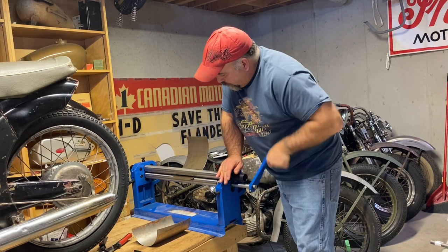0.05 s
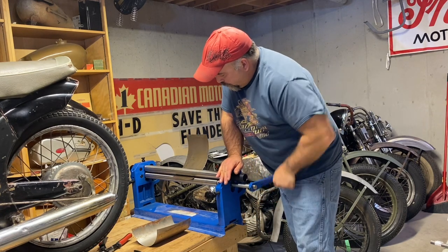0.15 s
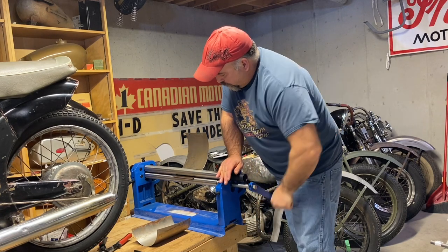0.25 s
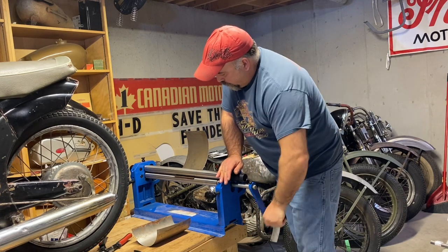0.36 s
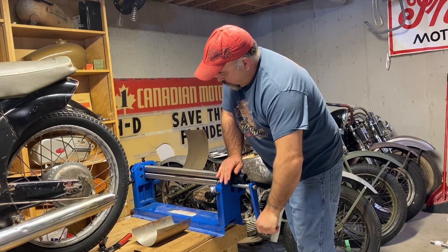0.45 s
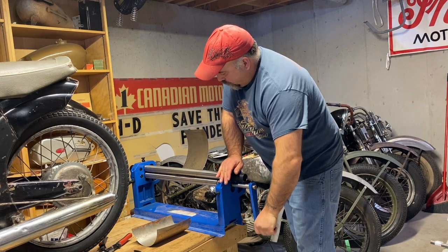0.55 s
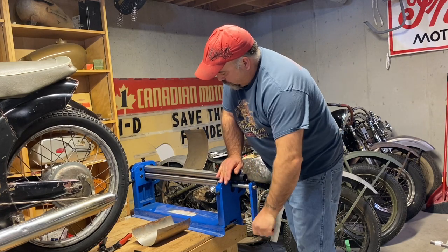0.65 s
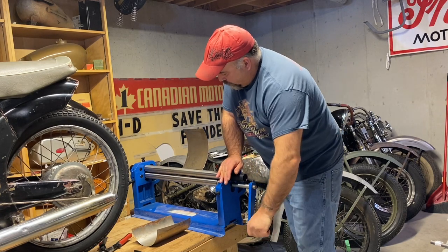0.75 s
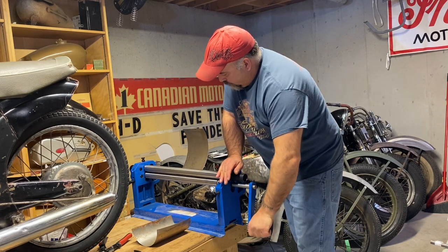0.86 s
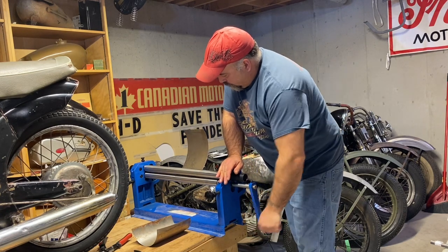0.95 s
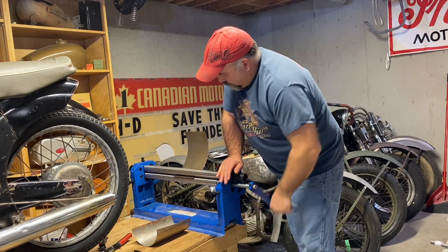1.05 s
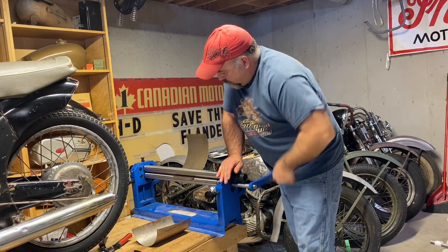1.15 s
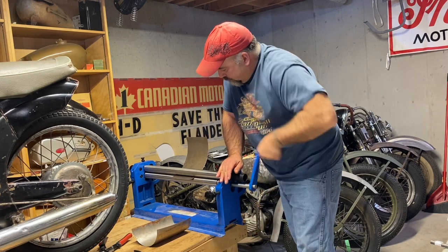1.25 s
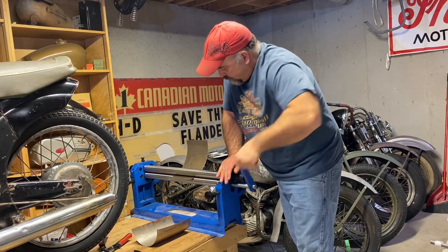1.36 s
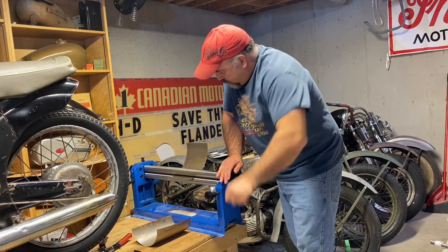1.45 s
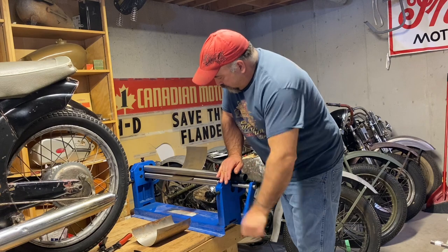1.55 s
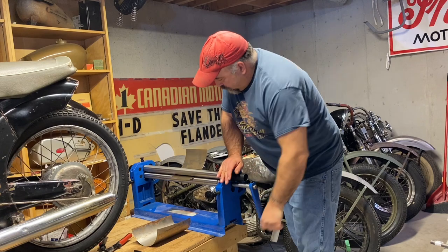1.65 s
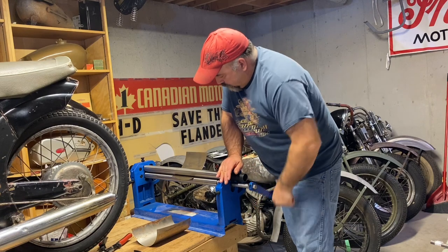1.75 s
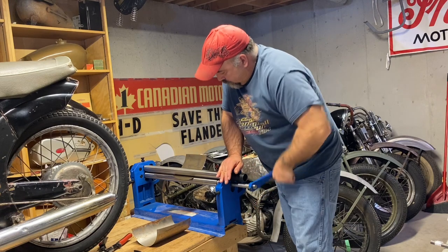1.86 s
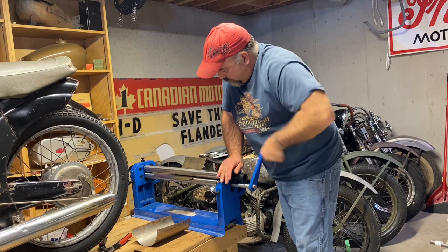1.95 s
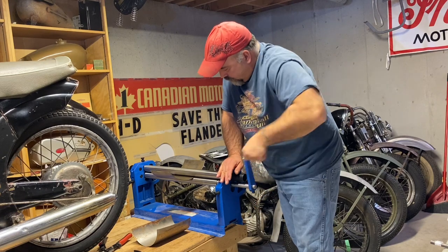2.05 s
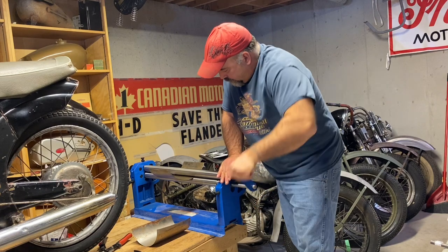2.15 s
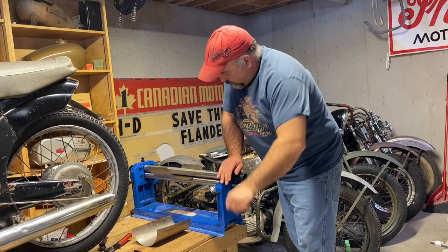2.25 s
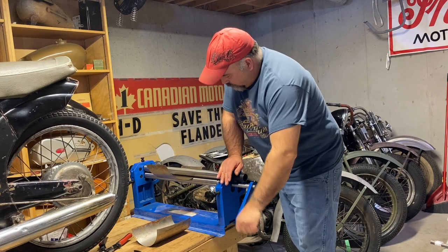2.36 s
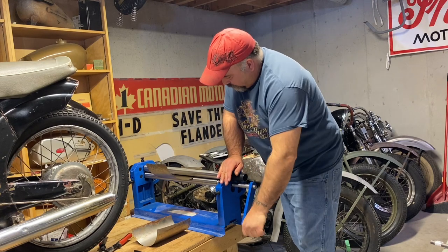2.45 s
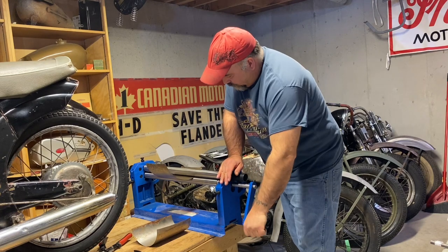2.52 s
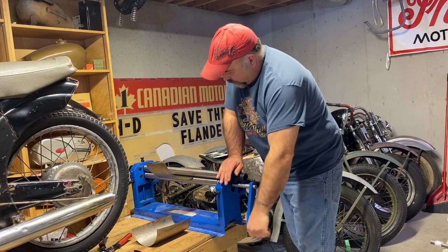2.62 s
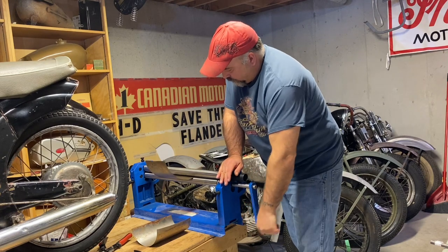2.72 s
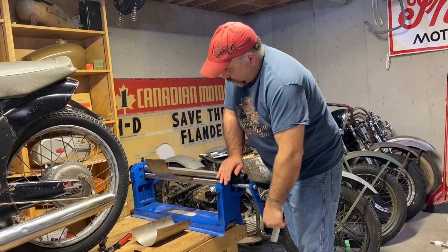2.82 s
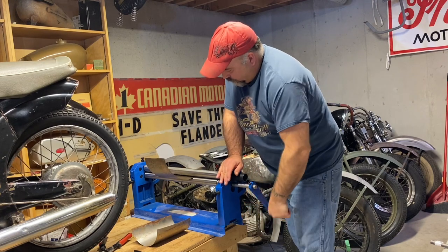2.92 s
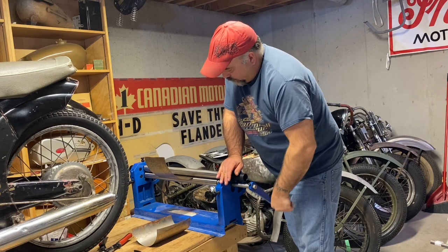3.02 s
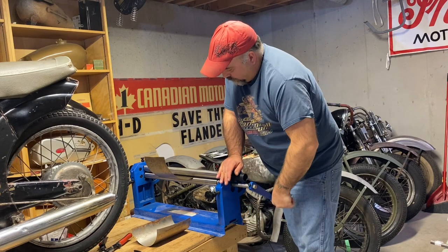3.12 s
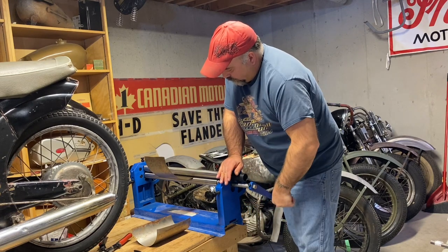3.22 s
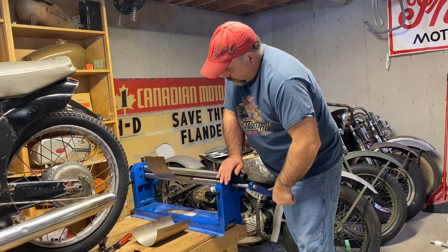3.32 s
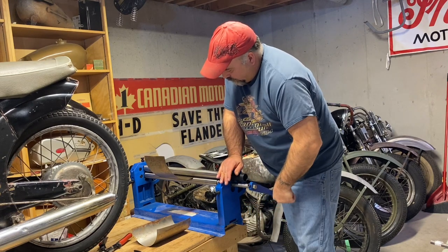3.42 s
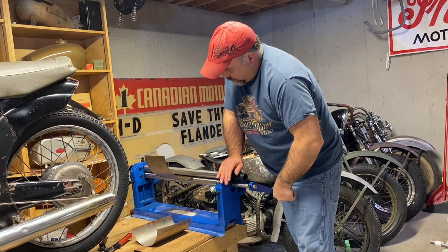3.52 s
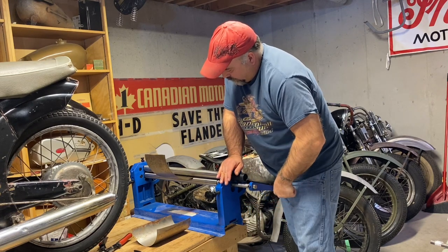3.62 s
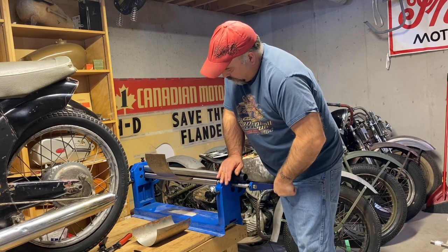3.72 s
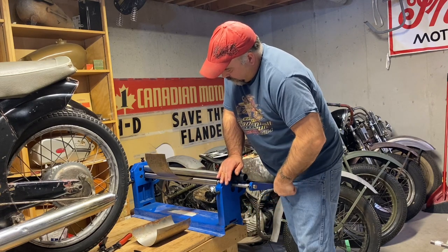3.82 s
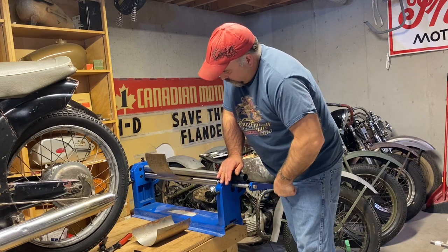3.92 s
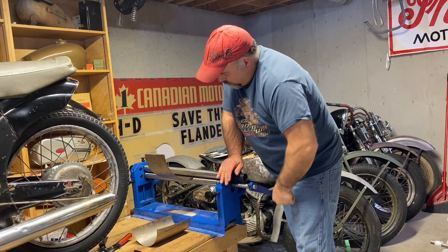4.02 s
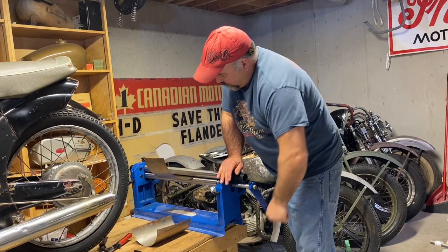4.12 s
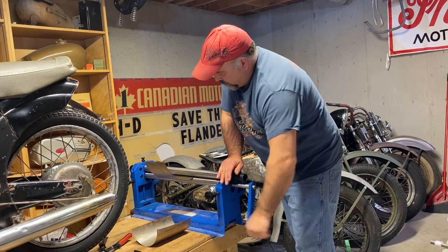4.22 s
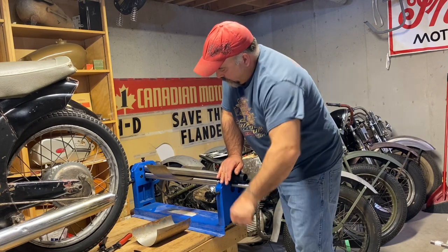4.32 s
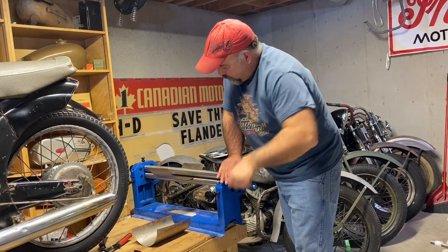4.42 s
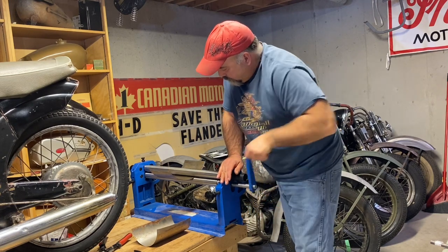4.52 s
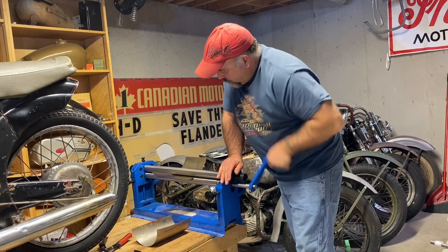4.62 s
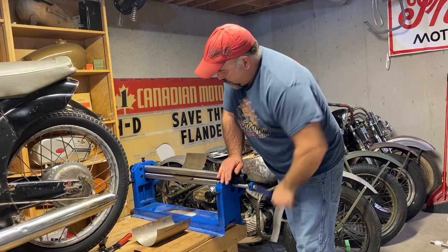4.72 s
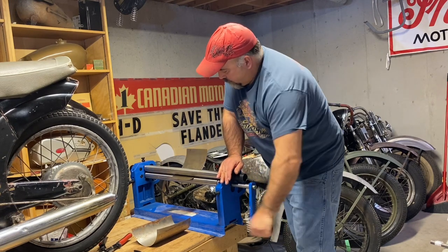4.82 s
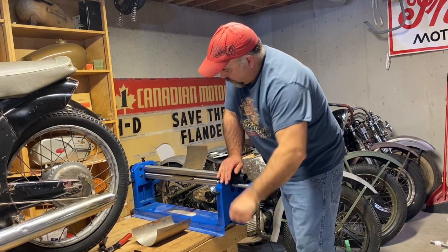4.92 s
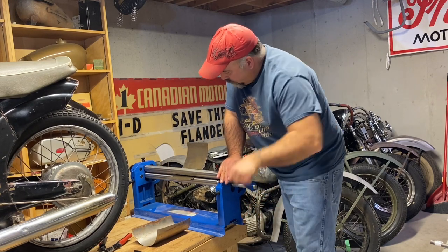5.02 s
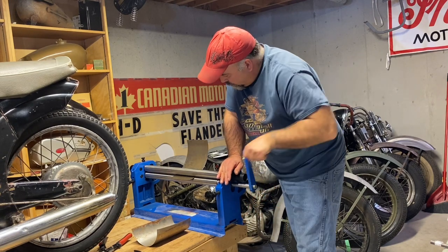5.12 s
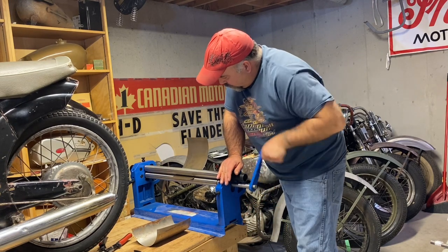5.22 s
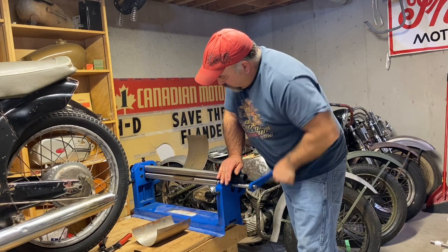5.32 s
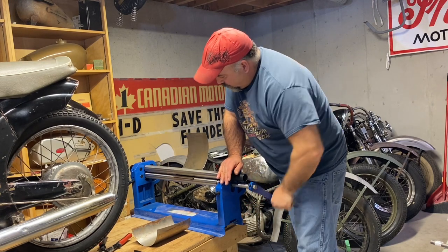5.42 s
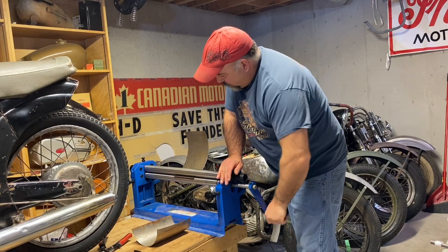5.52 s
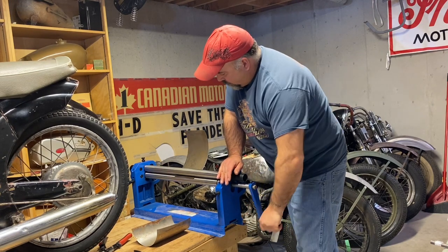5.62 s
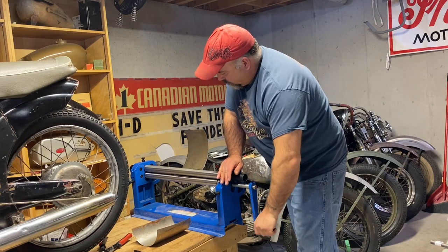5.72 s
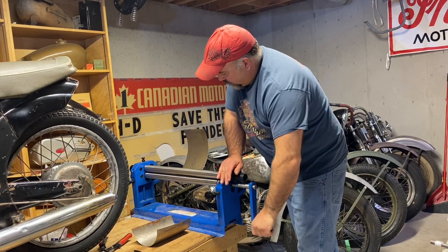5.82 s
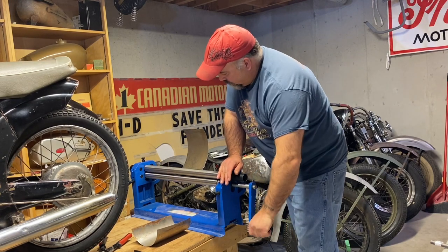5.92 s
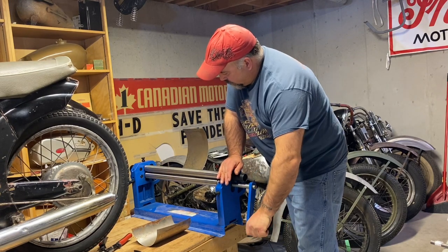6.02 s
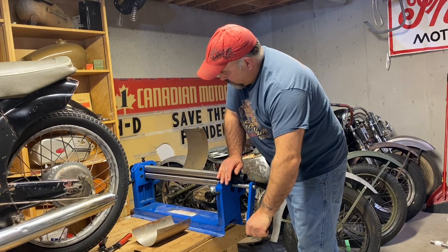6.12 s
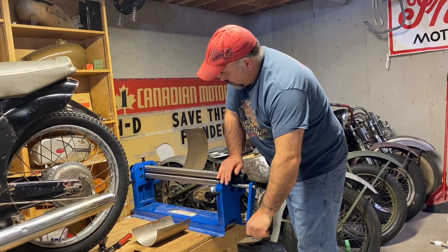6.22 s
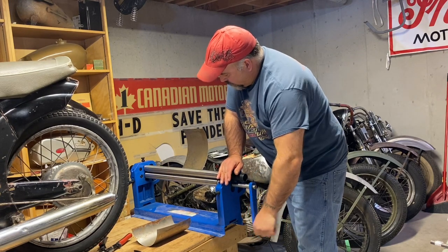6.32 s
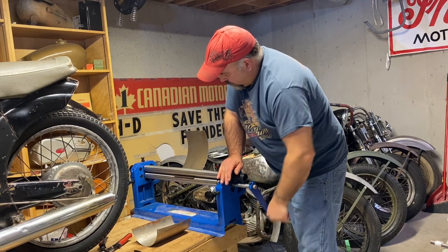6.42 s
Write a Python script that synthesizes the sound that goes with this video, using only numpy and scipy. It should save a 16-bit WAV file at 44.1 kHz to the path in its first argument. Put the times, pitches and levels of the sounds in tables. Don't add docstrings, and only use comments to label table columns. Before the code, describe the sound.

A hand-cranked steel roller works a metal sheet on a wooden bench, heard close in stereo in a concrete workshop with short reverberation. A steady low electrical hum and soft air lie underneath. At 0 s a dull woody rumble is already under way, fading by 0.5. Around 0.9 a bright rattle and clack start a busy spell: rolling rumble, gritty scraping, gear ticks and booming planks, with dense hard clacks at 1.35-1.6 and 1.7-2.5, some ringing briefly. A resonant knock at 2.8 ends it; only rubs and separate clacks near 3.2 and 3.5 break the lull. At about 4 s the cranking returns, uneven and scraping, with clacks at 4.1, 4.5 and 5.1 and hollow wooden thumps, thinning after 5.5. Near quiet follows until a sharp clack at 6.3 and another short push with a metallic knock around 6.4.

```python
import sys
import numpy as np
from scipy import signal
from scipy.fft import rfft, irfft, next_fast_len
from scipy.io import wavfile

SR = 44100
rng = np.random.default_rng(int(sys.argv[2]) if len(sys.argv) > 2 else 0)


def how_loud(loudness_db):
    steps = np.asarray(loudness_db, float) / 20
    return 10 ** steps


def waveform_to_disk(signal):
    frames = np.transpose(np.atleast_2d(signal))
    scaled = np.clip(frames, -1, 1) * 32767
    samples = np.round(scaled).astype(np.int16)
    wavfile.write(sys.argv[1], SR, samples)


N = 285327
SIZE = next_fast_len(N + SR)
HZ = np.maximum(np.arange(SIZE // 2 + 1) * SR / SIZE, 1)
TIME = np.arange(N) / SR


def rms_one(x):
    return x / np.sqrt(np.mean(x ** 2) + 1e-30)


def at_hz(points, hz):
    table_hz, value = np.array(points).T
    return np.interp(np.log(hz), np.log(table_hz), value)


def through(x, response):
    return irfft(rfft(x, SIZE) * response, SIZE)[..., :N]


def band(x, low_hz, high_hz):
    edges = [low_hz, min(high_hz, 0.45 * SR)]
    return signal.sosfilt(signal.butter(2, edges, "band", fs=SR, output="sos"), x)


def drift(rate_hz):
    r = np.exp(-2 * np.pi * rate_hz / SR)
    slow = signal.lfilter([1], [1, -2 * r, r * r], rng.standard_normal(N + SR))
    return rms_one(slow[SR:])


def resonate(x, hz, width_hz):
    r = np.exp(-np.pi * width_hz / SR)
    gain = np.array([1, 0, -1]) * (1 - r * r) / 2
    return signal.lfilter(gain, [1, -2 * r * np.cos(2 * np.pi * hz / SR), r * r], x + 1e-18)


def grit(per_s, spread_db):
    sizes = how_loud(spread_db * np.minimum(rng.exponential(1, N), 5)) * rng.standard_normal(N)
    return rms_one(sizes * (rng.random(N) < per_s / SR))


# (frequency [Hz], likeness [0 to 1])
LEFT_RIGHT_LIKENESS = [(90, 0.94), (250, 0.85), (600, 0.38), (1400, 0.0177), (3000, 0.45), (5600, 0.0846),
                       (7000, 0.85), (15000, 1)]


def spread(common, apart):
    alike = np.clip(at_hz(LEFT_RIGHT_LIKENESS, HZ), 0, 1)
    return np.sqrt(1 + alike) * common + np.sqrt(1 - alike) * apart * [[1], [-1]]


# (frequency [Hz], level [dB per Hz])
ROOM_AIR = [(25, -112), (60, -82), (160, -97.5), (500, -110), (1100, -117), (2000, -123), (8000, -130),
            (16000, -138)]


def background():
    turn = 2 * np.pi * np.cumsum(120.8 + 0.25 * drift(8.4)) / SR
    hum = np.sqrt(2) * how_loud(-49.5 + 1.1 * drift(25)) * np.sin(turn)
    air_level = how_loud(-2 + at_hz(ROOM_AIR, HZ)) * np.sqrt(SR / 2)
    common, apart = rfft(rng.standard_normal((2, N)), SIZE) * air_level
    return hum + irfft(spread(common, apart), SIZE)[:, :N]


# (frequency [Hz], width [Hz], level [dB])
BENCH_MODES = [(152, 3.1, -6.5), (213, 6.7, 9), (266.6, 49.8, 1), (310, 16.5, -31), (348, 5, -4.5),
               (441, 36, -1.5), (426.4, 6.8, 0.5), (530, 13.7, 1.5), (594, 7.9, -6), (748, 39, -10),
               (884, 600, -32.5), (1040, 13, -15.5)]


def bench(force, widen, patchy_db):
    answer = 0
    for k, (hz, width, db) in enumerate(BENCH_MODES):
        side = (-1) ** k
        answer = answer + side * how_loud(db + patchy_db * drift(8.0)) * resonate(force, hz, widen * width)
    return answer


def effort(s, length, levels_db):
    let_go = 1.375
    t = np.arange(0, N + 64, 64) / SR
    since = t - s[:, None]
    late = since / (length[:, None] * np.where(since > 0, let_go, 1))
    power = np.sum(how_loud(2 * levels_db[:, None]) * np.exp(-2 * late ** 2), axis=0)
    return np.interp(TIME, t, 10 * np.log10(power + 1e-14))


# (time [s], half length [s], weight on the rolls [dB], slip of the sheet [dB])
CRANK_PUSHES = [(0.0, 0.072, -43, -60.5), (0.177, 0.14, -49.5, -72), (0.347, 0.077, -55.5, -81),
                (0.983, 0.05, -50, -50.5), (1.13, 0.074, -47.5, -57.5), (1.245, 0.051, -38.5, -55.5),
                (1.393, 0.14, -51, -59), (1.55, 0.13, -41.5, -52.5), (1.672, 0.019, -36.5, -65),
                (1.887, 0.086, -52, -53.5), (2.056, 0.041, -41.5, -76), (2.23, 0.081, -44, -61.5),
                (2.311, 0.058, -40, -51), (2.475, 0.056, -60, -51.5), (2.632, 0.1, -60, -68.5),
                (2.8, 0.087, -55.5, -72), (2.94, 0.061, -55, -65), (3.995, 0.027, -44.5, -48.5),
                (4.124, 0.039, -53.5, -53), (4.264, 0.065, -43.5, -56), (4.442, 0.08, -44.5, -58),
                (4.646, 0.097, -45, -56), (4.825, 0.07, -58, -55), (4.985, 0.093, -44, -63),
                (5.09, 0.089, -44.5, -55.5), (5.313, 0.086, -44.5, -59), (5.415, 0.053, -46, -84),
                (5.642, 0.078, -60, -83), (6.348, 0.026, -58, -62), (6.42, 0.14, -51.5, -57.5)]
# (time [s], half length [s], level [dB])
BENCH_LURCHES = [(0.953, 0.031, -48.5), (1.21, .05, -61), (1.753, 0.055, -41.5), (1.997, 0.054, -42.5),
                 (2.316, 0.05, -58), (6.44, 0.04, -59), (1.537, 0.033, -45.5), (2.93, 0.039, -61),
                 (5.456, .03, -58), (.7, 0.073, -62.5), (3.64, .05, -65), (6.06, 0.088, -68)]
# (frequency [Hz], level [dB per Hz])
ROLL_RUMBLE = [(90, -43.5), (150, -2), (350, 6), (700, -12.5), (1200, -39), (2500, -50.5)]
# (frequency [Hz], level [dB per Hz])
SHEET_SCRAPE = [(600, 24.5), (1000, 22), (2000, 15.5), (4000, 11.5), (6000, 2), (8000, 1), (10000, -48.5)]
# (frequency [Hz], level [dB per Hz])
BENCH_SWAY = [(20, -55), (35, -8.5), (52, 11), (68, 17.5), (85, 0.5), (105, 12), (150, 18.5), (220, -48.5)]


def rolls():
    s, length, weight_db, slip_db = np.transpose(CRANK_PUSHES)
    hiss_db = -82 + 0.62 * (slip_db + 67.0)
    sway_db = -52 + 0.63 * (weight_db + 45)
    sway_pushes = np.hstack([[s, 1.74 * length, sway_db], np.transpose(BENCH_LURCHES)])

    force = grit(900, spread_db=3.5) * how_loud(1.2 * drift(26.4))
    rumble = rms_one(bench(force, widen=1.66, patchy_db=1.0))
    rumble = rumble + 0.84 * rms_one(through(force, how_loud(at_hz(ROLL_RUMBLE, HZ))))

    slip = grit(2500, spread_db=1.5) * how_loud(3 * drift(25))
    rough = through(slip, how_loud(at_hz(SHEET_SCRAPE, HZ)))
    regions_hz = np.geomspace(700, 7900, num=8)
    scrape = rms_one(sum(how_loud(1.6 * drift(9)) * band(rough, hz / 1.17, hz * 1.19) for hz in regions_hz))
    hiss = rms_one(band(band(slip, 4600, 17000), 7600, 15000))

    sway = rms_one(through(rng.standard_normal(N), how_loud(at_hz(BENCH_SWAY, HZ)))) * how_loud(0.86 * drift(4.9))
    wood = how_loud(effort(s, length, weight_db) - 1.5) * rumble + how_loud(effort(*sway_pushes) + 3.5) * sway
    steel = how_loud(effort(s, length, slip_db) + 2.0) * scrape + how_loud(effort(s, length, hiss_db) + 2) * hiss
    return wood, steel


def swelling_tone(hz, s, length, db):
    return how_loud(effort(s, length, db)) * np.sin(2 * np.pi * hz * TIME)


# (time [s], level [dB])
MID_PLANK_BOOMS = [(.07, -53), (.15, -42.5), (1.09, -48), (1.19, -47), (1.4, -42.5), (1.5, -50),
                   (1.61, -39.5), (4.33, -49), (4.41, -44), (4.58, -43), (4.97, -42), (5.02, -43),
                   (5.22, -46), (5.62, -52.5)]
# (time [s], level [dB])
LOW_PLANK_BOOMS = [(.12, -47), (.22, -51), (.3, -47), (.96, -47), (1.24, -44), (1.33, -38.5), (1.47, -42),
                   (1.62, -50), (2.01, -47), (2.26, -61), (2.42, -44), (4.08, -47), (4.18, -44),
                   (4.23, -38), (4.45, -46), (4.54, -47), (4.63, -50), (4.83, -39), (5.14, -39),
                   (5.18, -46), (5.23, -48), (5.34, -42), (5.44, -44.5), (5.53, -46), (5.66, -50)]
# (time [s], level [dB])
HIGH_PLANK_BOOMS = [(.15, -52), (1.04, -48), (1.49, -43), (1.62, -42), (2.23, -44), (2.28, -43),
                    (2.37, -46), (4.42, -49), (4.73, -47.5), (5.22, -50.5), (5.28, -47), (5.43, -46)]


def planks():
    out = np.zeros(N)
    for hz, booms in [(262, MID_PLANK_BOOMS), (217.4, LOW_PLANK_BOOMS), (436.6, HIGH_PLANK_BOOMS)]:
        s, db = np.transpose(booms)
        out += swelling_tone(hz, s, np.full(len(s), 0.014), db)
    return out


# (time [s], half length [s], level [dB])
LONG_ROLL_SWELLS = [(0.252, 0.024, -44), (1.143, 0.033, -42), (1.411, 0.0087, -38), (1.57, 0.015, -38),
                    (1.606, 0.0099, -46), (1.77, 0.0065, -38), (2.112, 0.017, -31.5), (2.207, 0.012, -47),
                    (2.24, 0.017, -49), (2.28, 0.015, -47), (4.014, 0.016, -45), (4.252, 0.032, -42),
                    (4.305, 0.018, -39.5), (4.498, 0.013, -39), (4.698, 0.0091, -41), (5.015, 0.011, -36.5),
                    (6.372, 0.028, -40.5), (0.095, 0.027, -47.5), (0.416, 0.02, -50), (0.948, 0.019, -43),
                    (1.06, 0.012, -51), (1.482, 0.012, -39.5), (1.887, 0.0083, -51), (2.775, 0.01, -49.5),
                    (3.582, 0.01, -55), (4.44, 0.011, -45), (4.934, 0.016, -43), (5.305, 0.0099, -45)]


def long_roll():
    return swelling_tone(353, *np.transpose(LONG_ROLL_SWELLS))


# (time [s], frequency [Hz], level [dB])
BUZZING_SHEET = [(0.136, 2400, -55.5), (.459, 990, -74), (0.923, 5300, -28), (0.932, 2600, -38.5),
                 (1.241, 990, -62), (1.351, 3680, -44), (1.37, 2780, -39.5), (1.369, 1550, -42.5),
                 (.972, 5000, -44), (1.727, 765, -39.5), (1.748, 706, -44), (2.082, 3080, -45.5),
                 (2.251, 560, -55), (2.815, 700, -33.5), (3.185, 626, -43.5), (3.539, 2240, -47.5),
                 (3.893, 600, -70), (4.037, 2280, -46), (4.791, 990, -62), (5.092, 995, -48),
                 (6.323, 5000, -56), (6.322, 1640, -40.5), (6.341, 607, -42), (6.359, 3250, -65)]
# (time [s], frequency [Hz], level [dB])
RINGING_PARTS = [(.141, 3020, -58), (0.922, 4570, -40), (0.924, 5020, -33), (.925, 5400, -45),
                 (1.811, 4630, -60), (2.081, 2356, -42.5), (2.081, 1550, -42.5), (2.1, 390, -51),
                 (2.111, 356, -51), (3.185, 2420, -48.5), (3.183, 940, -59), (4.04, 1084, -40),
                 (4.282, 357, -62), (5.021, 3380, -58), (5.383, 4850, -53), (6.325, 4570, -33),
                 (6.331, 2890, -42.5)]


def shivers():
    white = rng.standard_normal(N)
    out = np.zeros(N)
    for table, width_hz, dying_s in [(BUZZING_SHEET, 450, 0.02), (RINGING_PARTS, 95, 0.015)]:
        for s, hz, db in table:
            shake = white * (TIME > s) * np.exp(-np.abs(TIME - s) / dying_s)
            out += how_loud(db) * resonate(shake, hz, width_hz) * np.sqrt(SR / (np.pi * width_hz))
    return band(band(out, 147, 3900), 150, 6500)


# (time [s], crack [dB], ring [Hz], bench thud [dB])
GEAR_TEETH = [(0.1368, -40, 2820, -45.5), (0.578, -62.5, 3490, -88), (0.7953, -57.5, 3130, -86),
              (0.858, -48.5, 2210, -83), (0.8754, -36.5, 2640, -55), (0.9105, -30, 2220, -59.5),
              (1.351, -28, 3400, -82), (1.367, -29.5, 2850, -64), (1.491, -39.5, 5000, -55.5),
              (2.044, -29, 2290, -46), (2.398, -29.5, 4650, -54), (4.112, -30, 4200, -61),
              (4.733, -36.5, 3480, -43), (4.829, -31, 3160, -45), (5.006, -37, 4240, -33),
              (5.0583, -44, 4800, -58), (5.339, -59, 2470, -39), (6.24, -68.5, 2300, -73),
              (6.309, -32.5, 3260, -58), (6.422, -28, 3600, -42), (.967, -35, 5000, -51),
              (1.424, -39, 4000, -54), (1.5346, -47, 4500, -58), (1.578, -38, 4700, -60),
              (2.462, -44, 4000, -60), (2.49, -51, 4300, -55), (3.982, -37, 3000, -66),
              (4.4398, -35, 2390, -60), (4.4603, -38, 2500, -57), (4.778, -42, 4470, -63),
              (4.856, -41, 4800, -61), (5.231, -44, 3400, -59)]
# (time [s], bench thud [dB], frame knock [dB])
FRAME_BUMPS = [(0.463, -70.5, -61.5), (1.172, -51, -49), (1.236, -44, -34.5), (1.323, -40, -48),
               (1.73, -29.5, -35.5), (1.754, -41, -37), (2.018, -39, -39.5), (2.188, -65, -38.5),
               (3.0693, -52, -61), (3.8892, -47, -42), (3.959, -43.5, -45.5), (4.04, -56, -45),
               (4.211, -42, -38), (4.2786, -32, -39), (4.972, -41, -45), (5.289, -55, -76),
               (5.463, -45.5, -42)]
# (time [s], crack [dB], ring [Hz], bench thud [dB], glint [dB])
HANDLE_CLACKS = [(0.9247, -23.5, 4800, -50, -49), (1.0128, -25.5, 4370, -39.5, -57),
                 (1.563, -21.5, 3150, -28.5, -56), (1.588, -23, 4740, -64, -46),
                 (1.618, -25, 4570, -51, -49), (1.811, -27.5, 4870, -75, -44),
                 (1.9009, -20.5, 1990, -31.5, -58), (2.0632, -27.5, 4570, -45, -63),
                 (2.08, -39, 2920, -63, -44), (2.311, -26.5, 4500, -43, -51),
                 (2.3515, -26.5, 4570, -38.5, -49.5), (2.4734, -27.5, 3700, -37, -48.5),
                 (2.8106, -31, 3420, -32, -50.5), (3.181, -26.5, 4500, -50, -49),
                 (3.535, -29, 4470, -45, -53), (3.991, -35.5, 3460, -51.5, -62),
                 (4.0073, -48, 7050, -75, -42.5), (4.4896, -24.5, 4630, -40.5, -49.5),
                 (4.664, -39, 3030, -40, -56), (4.801, -43, 3200, -47, -57),
                 (5.0881, -27.5, 5000, -41.5, -52.5), (5.3828, -43, 4880, -42, -57),
                 (6.3227, -26.5, 4350, -37, -68)]
# (time [s], glint [dB])
GRIT_TICKS = [(4.288, -56), (4.303, -59), (4.323, -55), (4.337, -52), (3.994, -59), (1.368, -48.5),
              (4.113, -58), (2.398, -52), (4.66, -58), (5.2, -58), (5.31, -58)]


def contacts():
    rows = [(s, crack, hz, thud, crack - 11.5, crack - 44) for s, crack, hz, thud in GEAR_TEETH]
    rows += [(s, knock - 19, 1700, thud, knock, knock - 44) for s, thud, knock in FRAME_BUMPS]
    rows += [(s, crack, hz, thud, crack - 8.5, glint) for s, crack, hz, thud, glint in HANDLE_CLACKS]
    rows += [(s, glint + 2, 6500, glint - 38, glint - 38, glint) for s, glint in GRIT_TICKS]
    return np.transpose(rows)


# (frequency [Hz], width [Hz], level [dB])
STEEL_MODES = [(2420, 170, -3), (3370, 280, -0.5), (4570, 266, 2.5), (5000, 110, -6), (5080, 260, -10),
               (6970, 1000, -3)]


def clacks():
    s, crack_db, centre_hz, thud_db, knock_db, glint_db = contacts()
    at = (s * SR).astype(int)
    white = rng.standard_normal((2, N))

    def rattle(db, seconds, row=0, blow=2.56):
        marks = np.zeros(N)
        marks[at] = how_loud(db)
        dying = signal.lfilter([1], [1, -np.exp(-1 / (seconds * SR))], marks + 1e-18)
        return blow * marks + dying * white[row]

    def near_db(hz, slope_db):
        return -slope_db * np.abs(np.log2(hz / centre_hz))

    def blunt(x):
        return signal.sosfilt(signal.butter(4, 5900, fs=SR, output="sos"), x)

    glint = band(band(rattle(glint_db + 12.0, 0.0013), 6750, 14260), 4800, 13000)
    knock = band(band(rattle(knock_db + 10.5, 0.016, row=1, blow=1.5), 210, 1110), 180, 2600)
    crack = 0
    for hz in np.geomspace(1400, 6900, num=8):
        db = crack_db + near_db(hz, slope_db=30.0) - 9.0
        crack = crack + band(rattle(db, 0.0043), hz / 1.89, hz * 1.25)

    push = rattle(thud_db + 19.5, 0.024, row=1, blow=0.039) - rattle(thud_db + 20.5, 0.0048, row=1, blow=0.089)
    thud = bench(push, widen=3.07, patchy_db=1.5) + 0.27 * band(push, 220, 756)
    ring = 0
    for hz, width, db in STEEL_MODES:
        ring_db = crack_db + db + near_db(hz, slope_db=10.5) - 1.5
        ring = ring + resonate(rattle(ring_db, 0.0025), hz, width)
    return thud + blunt(ring), glint + knock + blunt(crack)


# (time [s], length [s], frequency [Hz], width [Hz], level [dB])
FAINT_RUBS = [(0.76, 0.043, 346, 40.7, -62.5), (0.79, 0.067, 212, 24, -59), (2.1, 0.066, 10500, 4900, -66),
              (2.418, 0.042, 10000, 6200, -67), (2.58, 0.17, 4040, 1200, -68),
              (2.6, 0.15, 8700, 6700, -69.5), (2.98, 0.14, 10700, 890, -78.5), (2.97, 0.24, 4100, 650, -78),
              (4.755, 0.042, 9300, 5400, -67), (5.651, 0.022, 10970, 2980, -76.5),
              (5.658, 0.043, 14500, 1100, -79), (5.672, 0.076, 1950, 670, -83),
              (5.72, 0.074, 2300, 470, -81.5), (5.946, 0.11, 10970, 2780, -84),
              (5.951, 0.075, 4150, 805, -81), (5.973, 0.091, 2700, 303, -87.5), (6.9, 0.03, 900, 1490, -69),
              (5.228, 0.036, 4800, 500, -67), (1.435, 0.025, 3800, 1200, -77), (0.22, 0.13, 2400, 900, -79),
              (0.427, 0.029, 2350, 500, -91), (4.182, .03, 3700, 1500, -61), (5.7, 0.037, 4100, 2000, -76),
              (5.95, .07, 225, 77, -64.5), (5.95, 0.12, 660, 70, -80.5), (6.264, 0.02, 350, 60, -63),
              (3.654, 0.042, 300, 120, -65), (4.018, 0.018, 10800, 1500, -65), (1.9, .03, 16000, 3000, -63),
              (2.97, .11, 6800, 2500, -78)]


def rubs():
    white = rng.standard_normal(N)
    out = np.zeros(N)
    for s, length, hz, width, db in FAINT_RUBS:
        swish = rms_one(resonate(resonate(white, hz, width), hz, width))
        out += how_loud(db) * np.exp(-((TIME - s) / length) ** 2) * swish
    return out


# (time [s], frequency [Hz], peak level [dB], time to fall 60 dB [s])
CLEAR_PINGS = [(.925, 2396, -45.5, .12), (1.015, 2400, -51, .12), (1.238, 1040, -42, 0.076),
               (1.369, 3020, -52, 0.049), (1.369, 1410, -50, 0.12), (1.492, 4260, -60, 0.11),
               (1.492, 6800, -62, 0.087), (1.588, 6500, -49, .05), (1.632, 2790, -54, 0.16),
               (1.729, 717, -33.5, 0.19), (1.729, 508, -31, 0.072), (1.728, 1040, -50, .2),
               (1.752, 791, -40.5, .15), (1.908, 1556, -42.5, 0.085), (1.94, 224, -33, 0.18),
               (1.968, 1490, -54, 0.13), (2.021, 527, -38, 0.15), (2.065, 4570, -66, .06),
               (2.08, 3260, -47, 0.046), (2.319, 521, -34, 0.079), (2.813, 594, -27, 0.079),
               (2.813, 1047, -42, 0.11), (2.82, 267, -31.5, 0.15), (3.191, 2800, -56, 0.14),
               (4.112, 3370, -54, 0.092), (4.211, 1134, -52, 0.11), (4.81, 948, -47, 0.14),
               (4.832, 1930, -64, .1), (4.852, 1040, -47, 0.13), (4.906, 569, -43.5, 0.26),
               (5.006, 4200, -56.5, .1), (5.006, 6760, -65, .1), (5.022, 3400, -60, 0.28),
               (5.088, 3250, -54, 0.066), (5.089, 2670, -50, 0.074), (5.093, 1026, -41.5, 0.13),
               (5.341, 262, -36, 0.12), (6.324, 5230, -49, .15), (6.425, 1044, -49, 0.15),
               (3.181, 5050, -36.5, 0.013), (3.534, 5100, -40, 0.011), (3.185, 900, -50, 0.18),
               (3.893, 529, -47.5, 0.12), (2.19, 780, -43, 0.11), (2.265, 698, -47, 0.085),
               (4.86, 194, -43, 0.13), (.46, 994, -61, 0.086), (2.083, 2310, -60, .2)]
# (time [s], frequency [Hz], peak level [dB])
PIN_TINKS = [
    (1.9, 5000, -50),
    (1.368, 2800, -34),
    (2, 5100, -45),
    (1.729, 1300, -47),
    (4.112, 4900, -45),
    (3.993, 4000, -48),
    (2.312, 4600, -44),
    (4.008, 9700, -50),
    (2.474, 3800, -51),
]


def pings():
    out, t = np.zeros(N + SR), np.arange(SR // 2) / SR
    for s, hz, db, t60 in CLEAR_PINGS + [(*row, 0.019) for row in PIN_TINKS]:
        at = int(s * SR)
        rise = 1 - np.exp(-t * hz / 1.1)
        out[at:at + len(t)] += how_loud(db - 60 * t / t60) * rise * np.sin(2 * np.pi * hz * t)
    return out[:N]


# (frequency [Hz], time to fall 60 dB [s])
ROOM_DECAY = [(60, 0.57), (300, 0.31), (1000, 0.32), (3000, 0.29), (7000, 0.23), (11000, 0.22),
              (14000, 0.26)]


def workshop(x, wet_db):
    t, edges, echoes = np.arange(SR) / SR, 30 * 2. ** np.arange(11), 0
    white = rng.standard_normal((2, SR)) * np.clip((t - 0.002) / 0.0015, 0, 1)
    for low, high in zip(edges, edges[1:]):
        if low < 0.4 * SR:
            t60 = at_hz(ROOM_DECAY, np.sqrt(low * high))
            echoes = echoes + band(white, low, high) * how_loud(-60 * t / t60)
    common, apart = rfft(echoes / np.sqrt(np.sum(echoes[0] ** 2)), SIZE)
    return through(x, 1 + how_loud(wet_db) * spread(common, apart))


def scatter(x, wet_db):
    edges, echoes = 400 * 2 ** np.arange(0, 5.1, 1 / 3), 0
    white = rng.standard_normal((2, 2, N))
    rise = np.exp(-1 / (0.00022 * SR))
    for k, (low, high) in enumerate(zip(edges, edges[1:])):
        keep = how_loud(-120 / (0.96 * at_hz(ROOM_DECAY, low) * SR))
        smoothing = np.convolve([1, -keep], [1, -rise])
        energy = signal.lfilter([(1 - keep) * (1 - rise)], smoothing, band(x, low, high) ** 2)
        echoes = echoes + np.sqrt(np.abs(energy)) * rms_one(band(white[k % 2], low, high))
    return x + how_loud(wet_db) * irfft(spread(*rfft(echoes, SIZE)), SIZE)[:, :N]


def scene():
    rumble, scrape = rolls()
    thuds, cracks = clacks()
    buzz = shivers()
    tones = planks() + long_roll() + pings()
    wood = workshop(rumble + thuds + 0.52 * tones + 0.49 * buzz, wet_db=-1.5) + 0.96 * tones
    steel = scatter(scrape + cracks + rubs() + 0.5 * buzz, wet_db=1.0)
    return how_loud(-3.5) * wood + how_loud(-7.0) * steel + background()


def top_cut(x):
    return signal.sosfilt(signal.butter(12, 16520, fs=SR, output="sos"), x)


# (frequency [Hz], level [dB])
MICROPHONE_RESPONSE = [(6000, -0.51), (9000, 2), (12000, -1), (13000, -2), (15500, -2.5), (15850, -10.5),
                       (16200, -33)]
# (frequency [Hz], lead [half
PORT_LEAD = [(0, 0), (950, .2), (3100, .25), (6600, .12), (7200, 0), (8300, -.8), (9450, -1.2), (13250, -3),
             (14600, -3.9), (17000, -5.1)]
# (frequency [Hz], left minus right [dB])
LEFT_MINUS_RIGHT = [(60, 0.5), (160, 1.5), (300, 1.3), (700, 3.5), (1400, 2.5), (3000, 3.5), (5500, 5),
                    (7000, -0.5), (15000, 0.5)]


def record(dry):
    half = np.array([[0.5], [-0.5]])
    lead = np.pi * np.interp(HZ, *np.transpose(PORT_LEAD))
    level = how_loud(at_hz(MICROPHONE_RESPONSE, HZ) + half * at_hz(LEFT_MINUS_RIGHT, HZ))
    return top_cut(through(dry, level * np.exp(1j * half * lead)))


dry = scene()
out = record(dry)
waveform_to_disk(out)
```